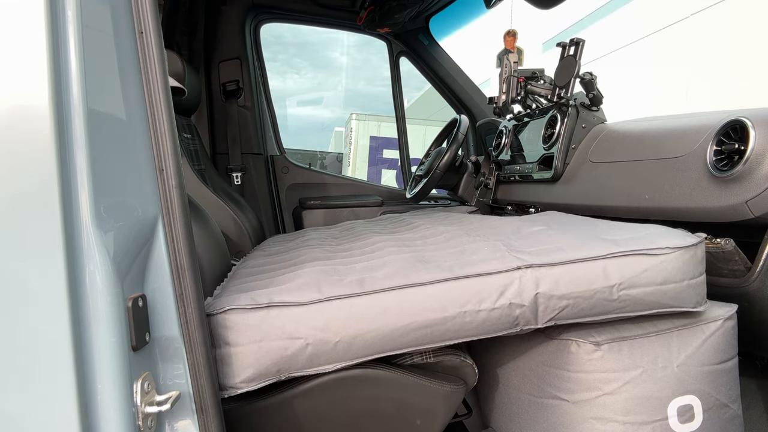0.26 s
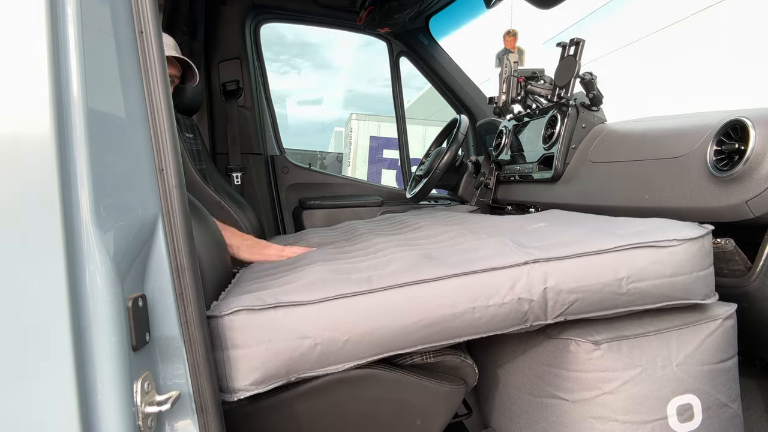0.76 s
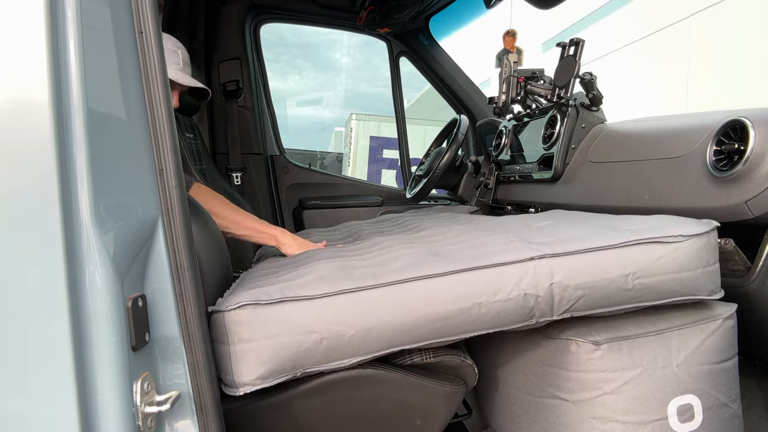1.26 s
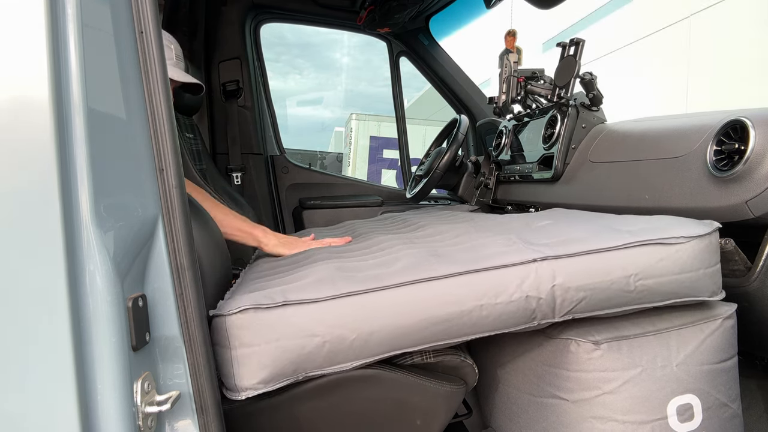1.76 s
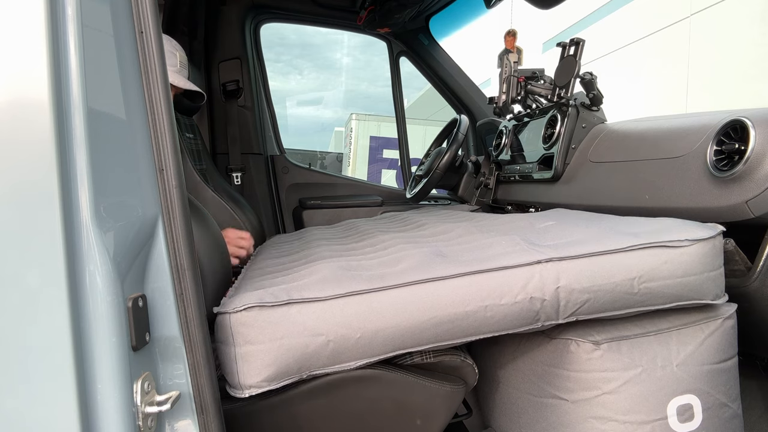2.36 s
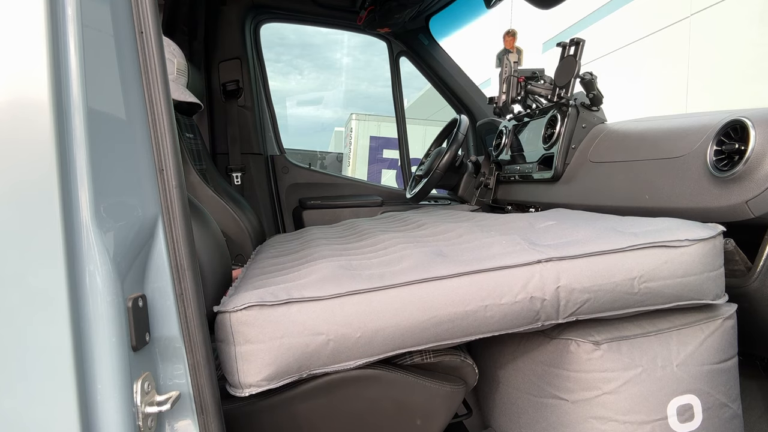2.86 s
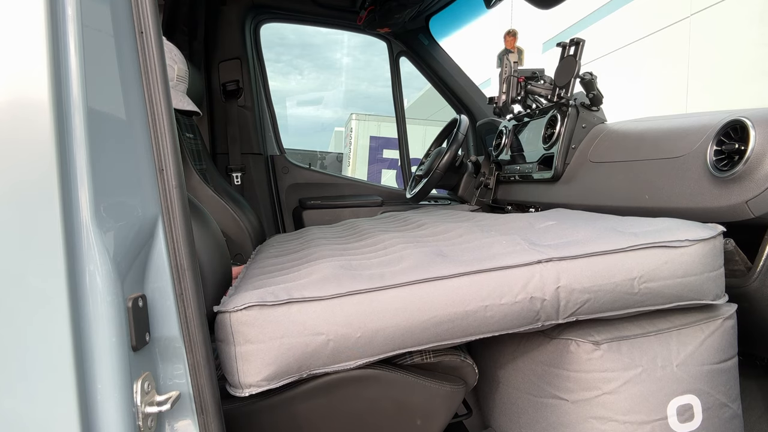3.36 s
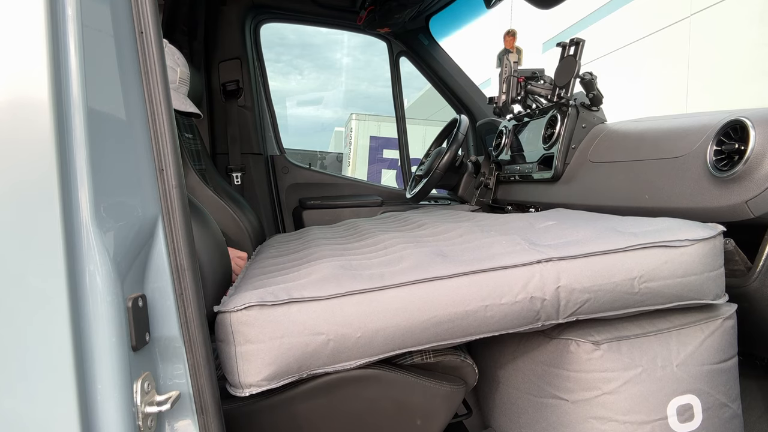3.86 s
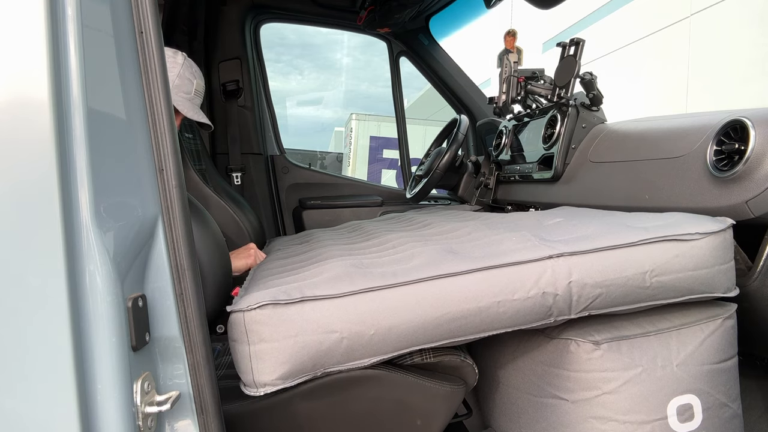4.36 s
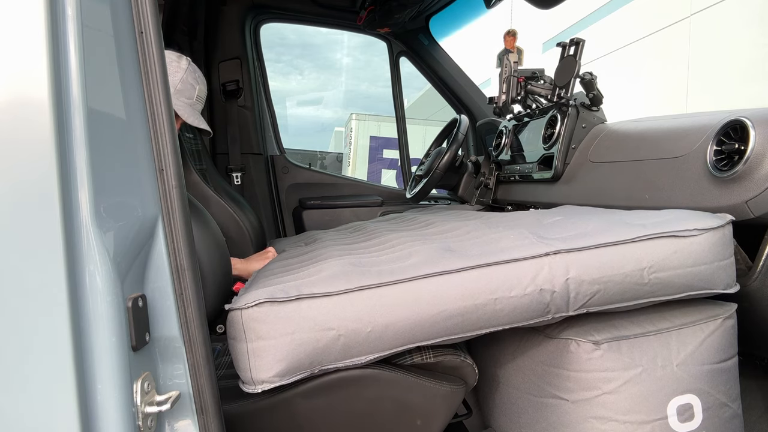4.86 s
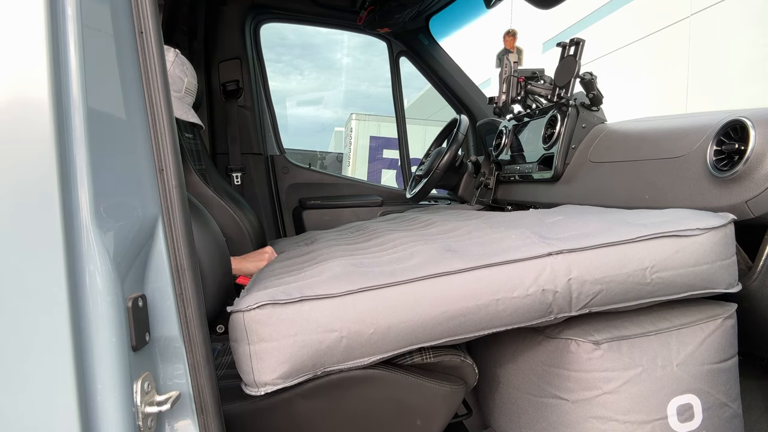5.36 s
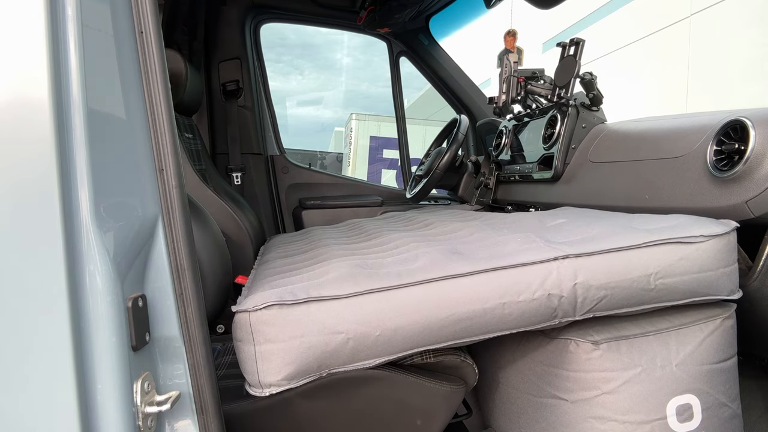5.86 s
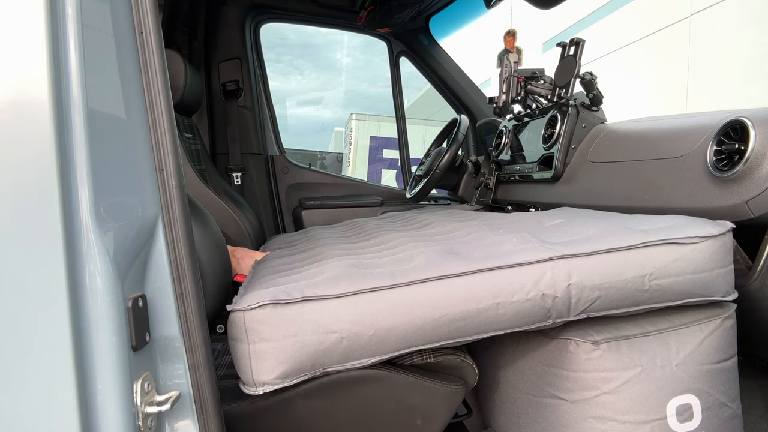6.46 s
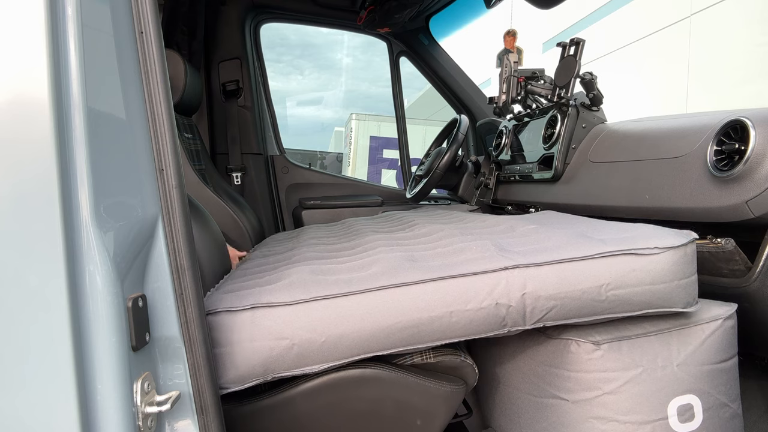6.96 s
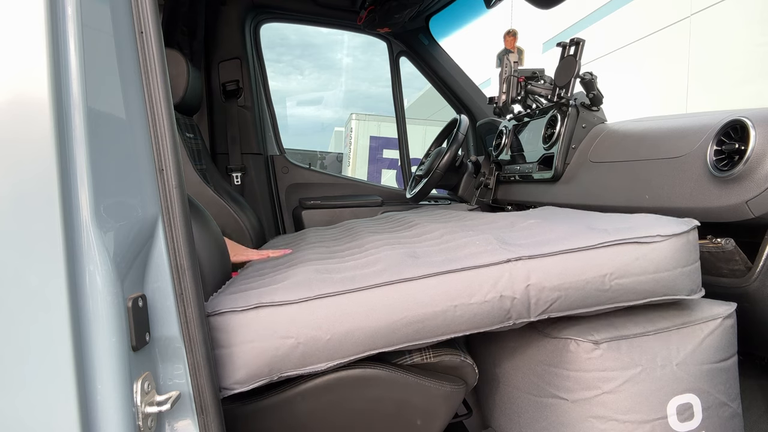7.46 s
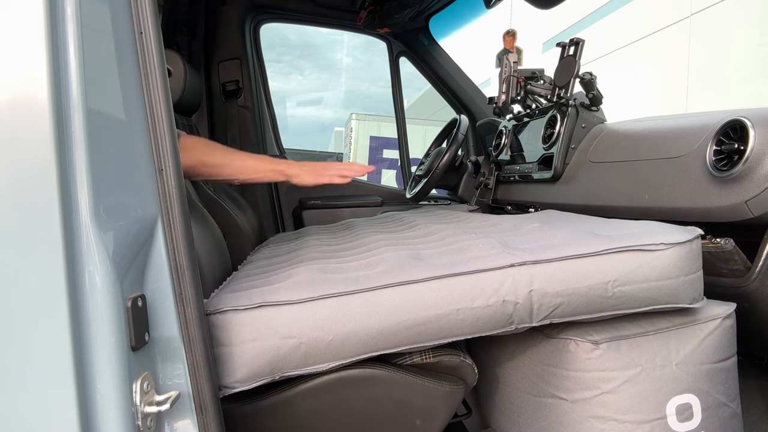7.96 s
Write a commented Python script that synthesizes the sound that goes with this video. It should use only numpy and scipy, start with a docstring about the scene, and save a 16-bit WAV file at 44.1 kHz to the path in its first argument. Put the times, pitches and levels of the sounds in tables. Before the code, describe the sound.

An electric blower inflates an air mattress with a rushing whine, then coasts to a stop, followed by fabric rubs and knocks.

```python
"""A small electric blower fills an air mattress on the front seats of a van, heard on the right channel only.
At first its intake is smothered: it hisses and whistles faintly. Then it opens, and turbulent air roars
under the whine of an eight-blade impeller. The pump is shifted with a bump, labours against back
pressure, is switched off and coasts down. Hands pat the mattress, the nozzle is pulled, the valve cap
snaps shut, and the fabric rubs and squeaks."""
import sys
import numpy as np
from scipy import signal
from scipy.fft import rfft, irfft, next_fast_len
from scipy.io import wavfile

SR = 44100
rng = np.random.default_rng(int(sys.argv[2]) if len(sys.argv) > 2 else 0)


def digitize_waveform(pressure):
    """Quantize a signal to 16-bit integers and store it at the path in sys.argv[1].

    Rows of a 2-D input are taken as channels; values are limited to [-1, 1].
    """
    field = np.atleast_2d(pressure).T
    bounded = np.clip(field, -1, 1)
    quanta = np.round(bounded * 32767).astype(np.int16)
    wavfile.write(sys.argv[1], SR, quanta)


N = 362502
TIME = np.arange(N) / SR

BLADES = 8
OPEN_S, SHIFT_S, OFF_S = 1.625, 3.46, 5.767   # intake opens, pump is shifted in the valve, switch-off


def from_db(db):
    """Decibels to gain."""
    return 10 ** (np.asarray(db) / 20)


def rms_one(x):
    """Scale to unit power."""
    return x / np.sqrt(np.mean(x ** 2) + 1e-20)


def in_time(rows):
    """Breakpoint rows, seconds first, become one envelope for each further column."""
    times, *columns = np.transpose(rows)
    return [np.interp(TIME, times, column) for column in columns]


def ramp(at_s, length_s):
    """A linear fade from 0 to 1, centred on a moment."""
    return np.clip((TIME - at_s) / length_s + .5, 0, 1)


def swell(at_s, length_s):
    """A smooth rise to 1 and fall around a moment."""
    return np.exp(-2 * ((TIME - at_s) / length_s) ** 2)


def drift(rate_hz):
    """A smooth random modulator of unit power, moving mostly below the given rate."""
    step = 40   # samples per control point
    hz = np.fft.rfftfreq(N // step, step / SR)
    slow = irfft(rfft(rng.standard_normal(N // step)) / (1 + (hz / rate_hz) ** 2))
    return np.interp(np.linspace(0, len(slow) - 1, N), np.arange(len(slow)), rms_one(slow))


def noises(spectrum):
    """One unit-power noise for each dB column of a spectrum, falling steeply outside its range."""
    points_hz, *columns = np.transpose(spectrum)
    size = next_fast_len(N)
    hz = np.fft.rfftfreq(size, 1 / SR) + 1
    outside = np.maximum(np.maximum(points_hz[0] / hz, hz / points_hz[-1]) - 1, 0)
    band = rfft(rng.standard_normal(size)) / (1 + (25 * outside) ** 2)
    colours = [from_db(np.interp(np.log(hz), np.log(points_hz), column)) for column in columns]
    return [rms_one(irfft(band * colour, size)[:N]) for colour in colours]


def butter(x, hz, kind="low", order=1):
    """A gentle low-pass or high-pass."""
    return signal.sosfilt(signal.butter(order, hz, kind, fs=SR, output="sos"), x)


def tone(cycles):
    """A unit-power sine from a running count of cycles, at a random phase."""
    return np.sqrt(2) * np.sin(2 * np.pi * (cycles + rng.random()))


def glide(hz, level_db, waver, flicker_db):
    """An unsteady whistle on a moving pitch."""
    gain = from_db(level_db + flicker_db * drift(34))
    return gain * tone(np.cumsum(hz * (1 + waver * drift(90))) / SR)


def ring(push, hz, t60):
    """A damped mode: a unit click sets a sine of height 1 ringing."""
    radius, angle = from_db(-60 / (t60 * SR)), 2 * np.pi * hz / SR
    return signal.lfilter([0, np.sin(angle)], [1, -2 * radius * np.cos(angle), radius ** 2], push + 1e-18)


def smothered_intake(hum_hz=838, hum_db=-77):
    """Air squeezes through a narrow gap, hissing brightly and whistling over a faint hum."""
    # Colour of the hiss. Each row: frequency in Hz, relative level in dB.
    leak_colour = [(100.0, -36), (200.0, -26), (320.0, -14), (500.0, -23), (1100.0, -27), (2400.0, -11),
                   (3400.0, -12.5), (4400.0, -5), (4950.0, -8), (5450.0, -1), (6100.0, -7.5),
                   (8200.0, -9.5), (9600.0, -4.5), (10300.0, -9.5), (11500.0, -11.5), (12900.0, -21),
                   (14000.0, -11.5), (15700.0, -17)]
    # Envelope of the hiss. Each row: time in seconds, level in dB.
    leak_level = [(0.0, -40), (0.2, -46.5), (0.32, -43.5), (0.6, -42.5), (0.8, -43), (0.95, -42.4),
                  (1.15, -42.5), (1.35, -41.5), (1.61, -41.8)]
    # Edge tone of the gap. Each row: time in seconds, pitch in Hz, level in dB.
    edge_tone = [(0, 1460, -52), (.1, 1350, -63), (.25, 1382, -60.5), (.34, 1315, -69), (.55, 1275, -70),
                 (.61, 1446, -69), (.71, 1220, -71), (.84, 1150, -73), (.93, 1220, -70), (1.02, 1490, -72),
                 (1.11, 1550, -62), (1.18, 1380, -65), (1.25, 1484, -69), (1.38, 1550, -62),
                 (1.45, 1720, -70)]
    hiss = noises(leak_colour)[0] * from_db(in_time(leak_level)[0] + 0.83 * drift(24))
    whistle = glide(*in_time(edge_tone), waver=0.01, flicker_db=3.5)
    return hiss + whistle + from_db(hum_db) * tone(hum_hz * TIME)


def motor(drag_per_turn=.002197, friction_turns_per_s2=39.95):
    """Shaft speed in turns per second, and how often drag and friction have halved it since switch-off."""
    # The powered motor sags as back pressure builds. Each row: time in seconds, turns per second.
    powered_speed = [(0, 333.5), (.85, 334.7), (1.36, 332.4), (1.5, 330.9), (2.8, 329.3), (3.43, 329.4),
                     (3.55, 324.7), (3.85, 317.5), (4.25, 314.7), (4.8, 315.2), (5.1, 313.9), (5.5, 316.1),
                     (5.75, 315.4)]
    driven, = in_time(powered_speed)
    balance = np.sqrt(friction_turns_per_s2 / drag_per_turn)   # speed at which both brake equally
    coasted_s = np.maximum(TIME - OFF_S, 0)
    speed = balance * np.tan(np.arctan(driven / balance) - drag_per_turn * balance * coasted_s)
    return speed, np.log2(driven / speed)


def blade_levels(halvings, shifted, opened, smothered_db=-63, unload_db=-17, fall_db=-4.5):
    """Each blade harmonic with its envelope in dB: set by the intake, swelling, falling with speed."""
    # The blade tone with the intake open. Each row: time in seconds, relative level in dB.
    whine_level = [(1.65, -55), (2.4, -52), (2.55, -63), (2.57, -51.5), (2.83, -48.5), (2.88, -41),
                   (2.95, -53.5), (3.02, -44), (3.56, -47.5), (3.66, -43), (4.38, -45), (4.62, -42.5),
                   (4.93, -63), (5.06, -41.5), (5.46, -49.5), (5.75, -47.5)]
    # Its overtones. Each row: harmonic, dB smothered, dB open, dB once shifted, dB per halving of speed.
    overtones = [(2, -57.5, -54, -50.5, -18.5), (3, -62.5, -50, -48, -25), (4, -59, -50.5, -53, -28),
                 (5, -67, -51.5, -51.5, -39.5), (6, -90, -88, -61, -26)]
    # Overtones swell and fade in the cab's standing waves as the pump is handled.
    # Each row: centre in seconds, length in seconds, harmonic, boost or dip in dB.
    swells = [(1.81, 0.22, 2, 8), (3.05, 0.54, 2, -6), (3.7, 0.25, 2, 7.5), (3.02, 0.28, 3, -21),
              (3.6, 0.1, 3, 13.5), (3.94, 0.19, 3, -26), (2.01, 0.18, 4, -24), (2.6, 0.46, 4, 4.5),
              (3.82, 0.19, 5, -9), (4.98, 0.18, 5, 8.5), (5.0, 0.07, 2, 8), (5.12, 0.25, 3, 5),
              (5.45, 0.1, 3, -15), (5.25, .2, 4, -11)]
    unloaded = ramp(OFF_S + 0.153, 0.15)
    running_db = in_time(whine_level)[0] + 5.5 + unload_db * unloaded + fall_db * halvings
    levels = [(1, smothered_db + opened * (running_db - smothered_db))]
    for harmonic, closed_db, open_db, after_db, halving_db in overtones:
        state_db = closed_db + opened * (open_db - closed_db) + shifted * (after_db - open_db)
        handled_db = sum(db * swell(s, length_s) for s, length_s, k, db in swells if k == harmonic)
        levels.append((harmonic, state_db + handled_db + halving_db * halvings + 2 * drift(4.7)))
    return levels


def blade_whine(speed, turns, levels, skirt_db=-19):
    """Blades passing the outlet chop the air into a flickering harmonic whine."""
    # Spells in which a lower companion tone beats with the blade tone.
    # Each row: centre in seconds, length in seconds, Hz below the blade tone, level against it in dB.
    beats = [(2.925, 0.38, 30, -13), (3.687, 0.3, 57, -10.5), (5.53, 0.35, 37, -5.5)]
    # Resonances that the falling tones sweep through. Each row: centre in Hz, width in Hz, boost in dB.
    resonances = [(733, 73, 14.5), (1120, 220, 9.5), (1865, 59, 8), (3050, 270, 5), (3620, 330, 10.5),
                  (4200, 290, 10.5)]
    # a falling tone crosses the cab's standing waves and so flickers more
    flicker_db = 1.7 + 3 * ramp(OFF_S + 0.074, 0.14)
    out = 0
    for harmonic, level_db in levels:
        cycles, pitch_hz = harmonic * BLADES * turns, harmonic * BLADES * speed
        # turbulent inflow shakes each harmonic and spreads a noisy skirt around it
        partial = tone(cycles) + from_db(skirt_db) * drift(74) * tone(cycles)
        if harmonic == 1:
            for s, length_s, beat_hz, beat_db in beats:
                lag_cycles = np.cumsum(beat_hz + 9 * drift(5.5)) / SR
                partial += from_db(beat_db) * swell(s, length_s) * tone(cycles - lag_cycles)
        boost_db = sum(db / (1 + (2 * (pitch_hz - hz) / width_hz) ** 2) for hz, width_hz, db in resonances)
        out += from_db(level_db + boost_db + flicker_db * drift(17.3)) * partial
    return out


def outdoor_rumble(level_db=-60.5):
    """A low, slightly wavering rumble comes in through the open door."""
    # Each row: frequency in Hz, relative level in dB.
    rumble_colour = [(15, -15), (28, -7), (42, 0), (70, -8), (110, -8.5), (170, -17), (300, -8.5),
                     (600, -21)]
    return noises(rumble_colour)[0] * from_db(level_db + drift(9.9))


def rubs():
    """Touches on fabric and nozzle: short swells of friction noise, each around its own pitch. The first row is
    a brief burst of noise at the very start, not a touch."""
    # Each row: centre in seconds, length in seconds, level in dB, band centre in Hz, width in Hz.
    strokes = [(0.01, 0.06, -52, 895, 700), (.2, 0.087, -43.5, 5200, 900), (.515, 0.0072, -52, 920, 700),
               (1.225, 0.0058, -54, 750, 700), (2.258, 0.051, -46, 2200, 1500),
               (3.421, 0.032, -29.5, 3780, 1700), (3.47, 0.059, -36.5, 3560, 1790),
               (3.508, 0.038, -45, 5780, 600), (6.68, 0.18, -60, 7000, 8000),
               (6.95, 0.061, -55.5, 10800, 8000), (7.191, 0.005, -46, 1100, 1500),
               (7.538, 0.31, -62.5, 4750, 7060), (7.704, 0.27, -66, 3280, 400),
               (8.213, 0.014, -50, 2780, 1220)]
    out = 0
    for s, length_s, level_db, centre_hz, width_hz in strokes:
        friction = rng.standard_normal(N)
        for q in (centre_hz / width_hz, centre_hz / width_hz / 2):
            friction = signal.lfilter(*signal.iirpeak(centre_hz, q, fs=SR), friction)
        out += from_db(level_db) * swell(s, length_s) * rms_one(friction)
    return out


def cab(x, t60=0.14, wet_db=-6, damping_hz=6100):
    """The padded cab adds dense, short reflections, dulled by its walls."""
    t = TIME[:SR // 3]
    tail = rng.standard_normal(len(t)) * from_db(-60 * t / t60) * (t > .003)
    tail = butter(tail / np.linalg.norm(tail), damping_hz)
    return x + from_db(wet_db) * signal.fftconvolve(x, tail)[:N]


def shaft_hum(speed, turns, shifted, gain_db=4, waver_db=3.5):
    """The unbalanced shaft hums at multiples of its turning rate, dying quickly as it slows."""
    # Each row: multiple of the turning rate, relative dB before the shift, relative dB after it.
    partials = [(1, -60, -56), (2, -61, -52), (3, -83, -52), (4, -55, -52), (5, -70.5, -60.5),
                (6, -69, -66.5), (7, -77, -62.5), (9, -67, -56.5), (10, -65, -68), (11, -80, -68),
                (12, -59.5, -56.5), (13, -65, -56), (14, -83, -60), (15, -64, -79), (18, -60, -75),
                (20, -64.5, -76)]
    out = 0
    for multiple, before_db, after_db in partials:
        level_db = gain_db + before_db + (after_db - before_db) * shifted + waver_db * drift(2)
        out += from_db(level_db) * tone(multiple * turns)
    return out * (speed / speed.max()) ** 5


def airflow(speed, halvings, shifted):
    """Turbulence coloured by the housing; it changes colour with the shift and darkens as the pump slows."""
    # Band envelopes under power. Each row: time in seconds, then roar, rush and hiss in dB before trim.
    band_levels = [(1.63, -37.5, -39, -49), (2.35, -37.5, -39, -46), (2.75, -38.5, -36.5, -44.7),
                   (3.35, -37.5, -38.5, -44.5), (3.8, -40.5, -43.5, -43), (4.45, -38, -39.5, -43),
                   (4.87, -38, -44, -45.5), (5.05, -38, -39.5, -42), (5.35, -37, -42.5, -44.5),
                   (5.72, -39.5, -43.5, -42.5)]
    # Low roar of housing and mattress.
    # Each row: frequency in Hz, then relative dB before the shift, after it and when coasting.
    roar_colour = [(109, -43, -23, -20), (176, -21, -18.5, -32.5), (283, -12, -11, -20),
                   (400.0, -11.5, -7, -7), (485, -7, -1.5, -7.5), (620, -5.5, -3, -1), (700.0, 0.5, 1, 2),
                   (774, -4.5, -1, -1), (1100, -7.5, -5, -9), (1220.0, -7, -6, -10),
                   (1326, -11.5, -13, -19.5), (1550.0, -22.5, -10.5, -12), (1850, -23.5, -16.5, -15),
                   (2200.0, -25, -22, -26.5)]
    # Rush in the impeller. Each row: frequency in Hz, then relative dB before the shift and after it.
    rush_colour = [(2200.0, -5, -9), (2500.0, -7, -7.5), (3060, 7.5, -0.5), (3280, 2, -3.5), (3300, 4, -1),
                   (3750.0, 7, -3.5), (3940, 2, 1), (4440, 4, -4), (4736, 5.5, -1.5), (5050, -18, -17),
                   (5000, -42, -4)]
    # Hiss at the intake. Each row: frequency in Hz, then relative dB before the shift and after it.
    hiss_colour = [(4940, -12, -9), (5460, -1.5, -4.5), (6220, 1, -3), (6250.0, -7.5, -2), (6450, -2, -2),
                   (7240, -4.5, -4), (7170, -1, 2.5), (8270, -6.5, -4.5), (8840, -10, -7.5),
                   (9930, -0.5, -4.5), (11900, -9, -5), (12500.0, -4, -8), (13300, 1.5, -6),
                   (15900, -19, -13)]
    trims_db, falls_db = (-0.5, -1.8, -0.94), (-9, -15.5, -26.5)   # falls are per halving of speed
    roar_db, rush_db, hiss_db = [level + trim + fall * halvings
                                 for level, trim, fall in zip(in_time(band_levels), trims_db, falls_db)]
    coasting = np.clip((290 - speed) / 90, 0, 1)   # fades in from 290 down to 200 turns per second
    before, after, coast = noises(roar_colour)
    roar = before + shifted * (after - before) + coasting * (coast - after)
    out = roar * from_db(roar_db + drift(11.5))
    for colour, level_db in ((rush_colour, rush_db), (hiss_colour, hiss_db)):
        before, after = noises(colour)
        out += (before + shifted * (after - before)) * from_db(level_db + drift(14))
    return out


def moving_reflections(x, echo_gain=0.24, sway=0.156):
    """Echoes off the arm and the swelling mattress comb the air noise; their paths slowly change."""
    delays = [delay_s * (1 + sway * drift(0.56)) for delay_s in (.0007, .0016, .0031)]
    return x + echo_gain * sum(np.interp(TIME - delay, TIME, x) for delay in delays)


def knocks(crack_t60=0.038, body_gain_db=-3.5, scatter_db=2.5):
    """Pats, bumps and snaps ring valve and mattress: soft ones mostly low modes, hard ones with a crack."""
    # Each row: start in seconds, push in dB, contact brightness in Hz, crack level in dB.
    contacts = [(2.255, -42, 1200, -41), (3.45, -30, 400, -26.5), (4.177, -28.5, 200, -66),
                (5.447, -32, 150, -66), (5.53, -29.5, 148, -66), (5.729, -66, 2500, -25.5),
                (6.229, -61, 591, -56), (6.526, -38.5, 400, -61), (6.647, -43, 900, -57),
                (6.706, -31, 900, -60), (6.722, -32, 300, -64), (7.016, -44, 400, -70),
                (7.042, -45.5, 2000, -55), (7.185, -46.5, 1510, -53), (7.2517, -28, 600, -33.5),
                (7.254, -14.5, 353, -42), (7.258, -22.5, 252, -34), (7.958, -45, 804, -65),
                (7.99, -42, 1500, -67), (8.059, -34.5, 120, -61), (8.108, -50.5, 2500, -57.5),
                (8.142, -42, 200, -76)]
    # Modes of valve and taut mattress. Each row: pitch in Hz, relative dB, seconds to decay by 60 dB.
    modes = [(54, -21, 0.6), (90, -22, 0.09), (173, -31, 0.034), (284, -3.5, 0.044), (380, -3, 0.049),
             (471, -10.5, 0.047), (642, -0.5, 0.082), (770, 9, 0.0095), (960, 2.5, 0.018),
             (1293, 10, 0.0073), (1490, -11, 0.035), (1820, -5, 0.053), (2860, -25, 0.045),
             (3250, -27, 0.056), (4200, -25, .045)]
    # The snap of plastic. Each row: frequency in Hz, relative level in dB.
    crack_colour = [(500, -2), (1900, 1), (3100, 9), (5000, 0.5), (8000, -5), (11500, -3.5), (16000, -12)]
    pushes, crack_envelope = np.zeros((len(modes), N)), np.zeros(N)
    t = TIME[:SR // 5]
    strengths = from_db(scatter_db * rng.standard_normal((len(contacts), len(modes))))
    for (s, push_db, contact_hz, crack_db), strength in zip(contacts, strengths):
        at = round(s * SR)
        push = np.exp(-2 * np.pi * contact_hz * t)
        push *= from_db(push_db) / push.sum()
        pushes[:, at:at + len(t)] += np.outer(strength, push)[:, :N - at]
        crack_envelope[at:at + len(t)] += from_db(crack_db - 60 * t / crack_t60)[:N - at]
    body = sum(from_db(db) * ring(push, hz, t60) for push, (hz, db, t60) in zip(pushes, modes))
    body = butter(body, 90, "high")   # slow motion radiates little
    return from_db(body_gain_db) * body + crack_envelope * noises(crack_colour)[0]


def blown_resonance(hz, level_db, half_width_hz):
    """Turbulence rings a damped cavity: a band of noise on a moving pitch."""
    phase = 2 * np.pi * np.cumsum(hz) / SR
    return from_db(level_db) * (drift(half_width_hz) * np.cos(phase) + drift(half_width_hz) * np.sin(phase))


def cavities(halvings, outlet_hz=1297, sag_hz=290, fall_db=-16):
    """Outlet and intake resonate; the outlet sinks with the speed, the intake stops at switch-off."""
    # Back pressure of the full mattress sounds the outlet. Each row: time in seconds, level in dB.
    outlet_level = [(3.45, -79), (3.7, -42.5), (4.6, -51.5), (5.0, -60), (5.25, -40.5), (5.75, -42)]
    # A hand around the intake moves its resonance. Each row: time in seconds, pitch in Hz, level in dB.
    intake_path = [(3.6, 3320, -45), (4.1, 3404, -41.5), (4.5, 3750, -41.5), (4.85, 3550, -42),
                   (5.0, 3520, -38), (5.12, 3450, -41.5), (5.25, 4240, -48), (5.5, 4340, -42),
                   (5.8, 4200, -43)]
    outlet_db = in_time(outlet_level)[0] + fall_db * halvings
    outlet = blown_resonance(outlet_hz - sag_hz * halvings, outlet_db, half_width_hz=226)
    intake = blown_resonance(*in_time(intake_path), half_width_hz=1100)
    return outlet + intake * (1 - ramp(OFF_S, 0.13))


def scene():
    """Air, impeller, handling and a faint steady hiss, all on the right channel."""
    speed, halvings = motor()
    opened, shifted = ramp(OPEN_S, 0.01), ramp(SHIFT_S, 0.29)
    rumble = outdoor_rumble()
    open_air = moving_reflections(airflow(speed, halvings, shifted)) + shifted * cavities(halvings) + rumble
    smothered_air = smothered_intake() + from_db(-23.5) * rumble
    air = np.sqrt(1 - opened) * smothered_air + np.sqrt(opened) * open_air   # equal-power crossfade
    handling = cab(knocks() + rubs() + squeaks())
    faint_hiss = from_db(-67.5) * butter(rng.standard_normal(N), hz=9400)
    turns = np.cumsum(speed * (1 + 0.00024 * drift(9.3))) / SR   # with a slight pitch jitter
    whine = blade_whine(speed, turns, blade_levels(halvings, shifted, opened))
    hum = opened * shaft_hum(speed, turns, shifted)
    return np.array([np.zeros(N), air + whine + hum + handling + faint_hiss])


def squeaks():
    """Skin slips on the taut fabric in brief falling chirps."""
    # Each row: centre in seconds, length in seconds, pitch in Hz, glide in Hz per second, level in dB.
    chirps = [(7.609, .014, 10420, -14000, -55), (8.03, .025, 7880, -3000, -55.5),
              (8.055, .015, 6820, -10000, -60)]
    return sum(swell(s, length_s) * glide(hz + hz_per_s * (TIME - s), db, waver=0.0055, flicker_db=4)
               for s, length_s, hz, hz_per_s, db in chirps)


def record(dry, cutoff_hz=15750):
    """The microphone loses the deepest bass; the top is cut steeply."""
    thinned = butter(dry, 32, "high", order=2)
    return signal.sosfilt(signal.ellip(12, .1, 80, cutoff_hz, fs=SR, output="sos"), thinned)


dry = scene()
out = record(dry)
digitize_waveform(out)
```